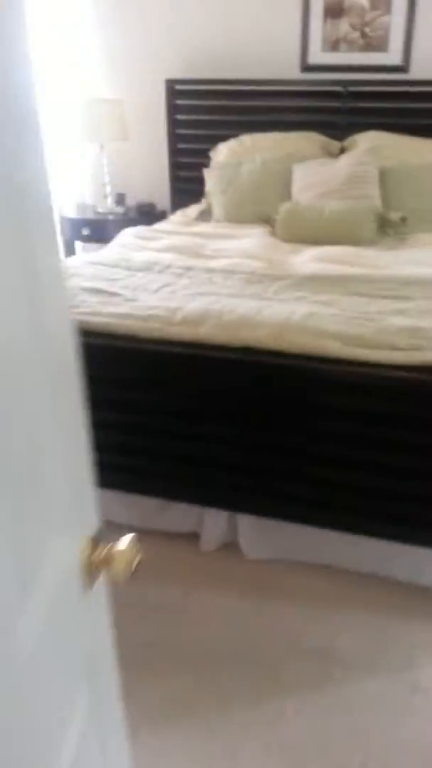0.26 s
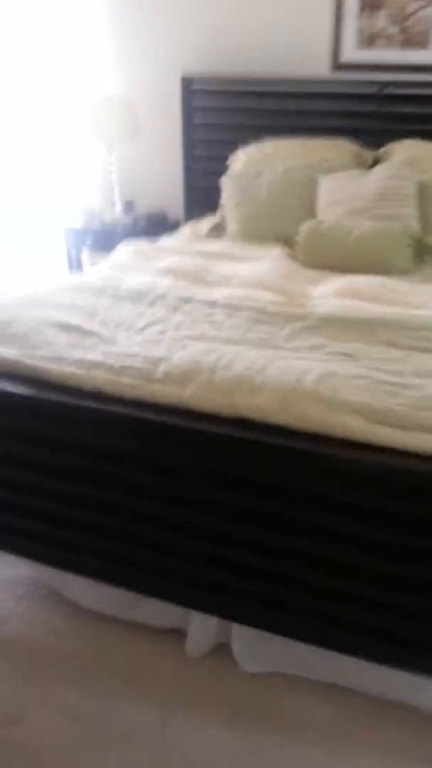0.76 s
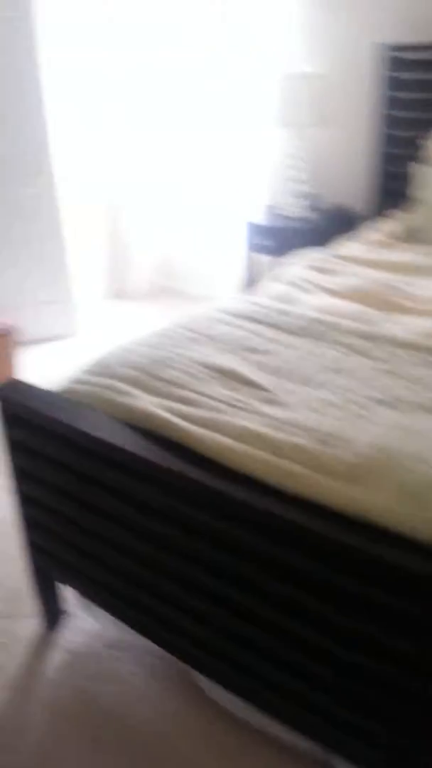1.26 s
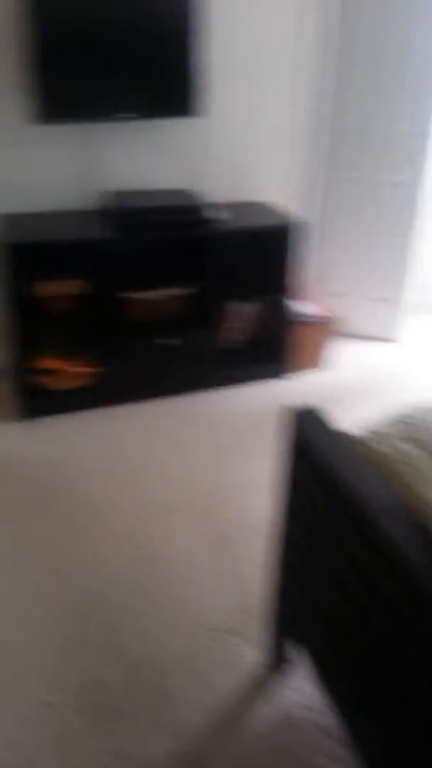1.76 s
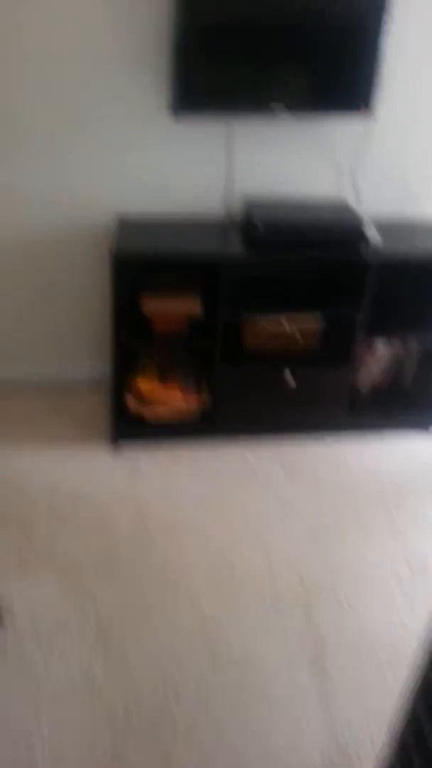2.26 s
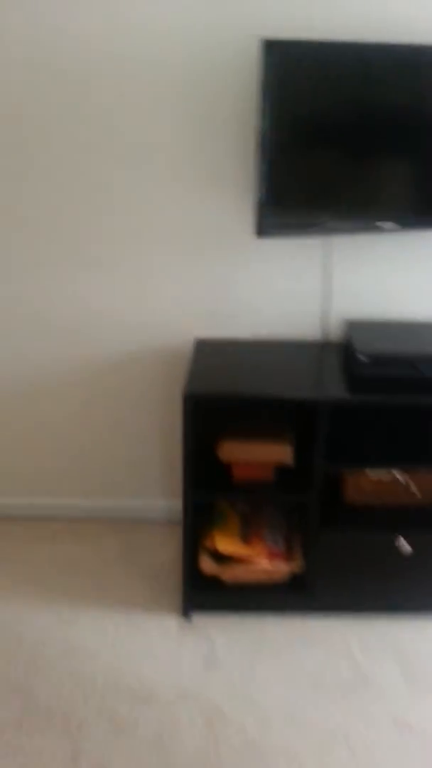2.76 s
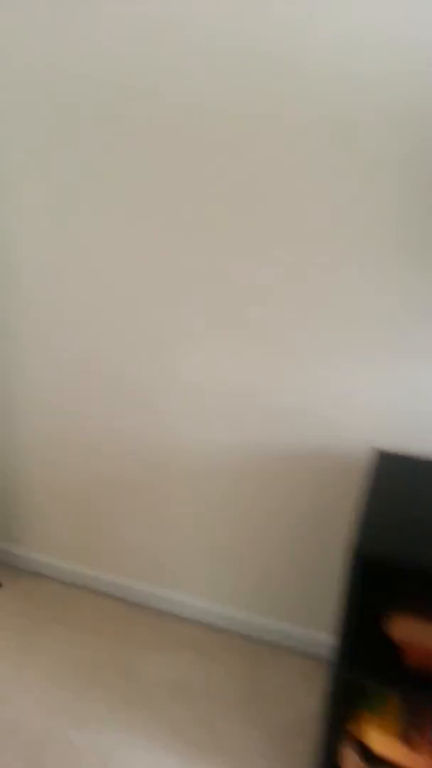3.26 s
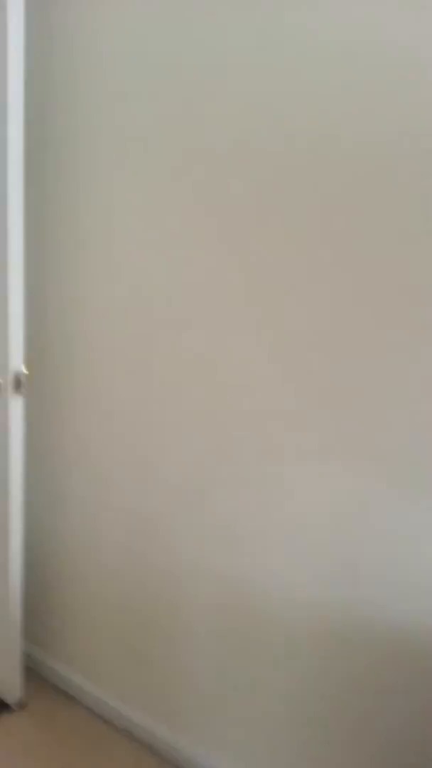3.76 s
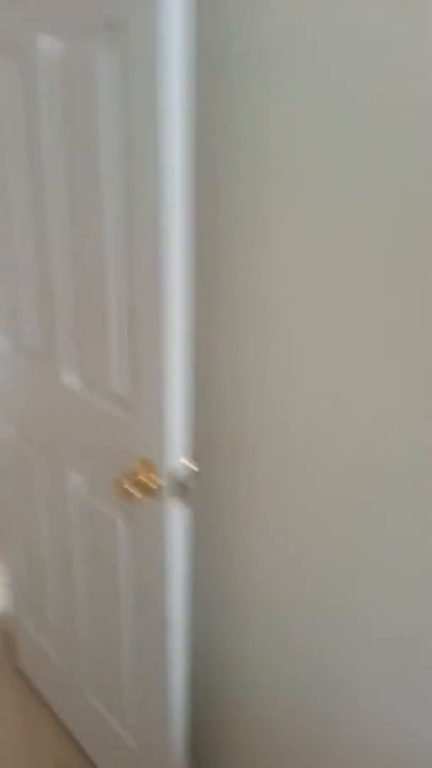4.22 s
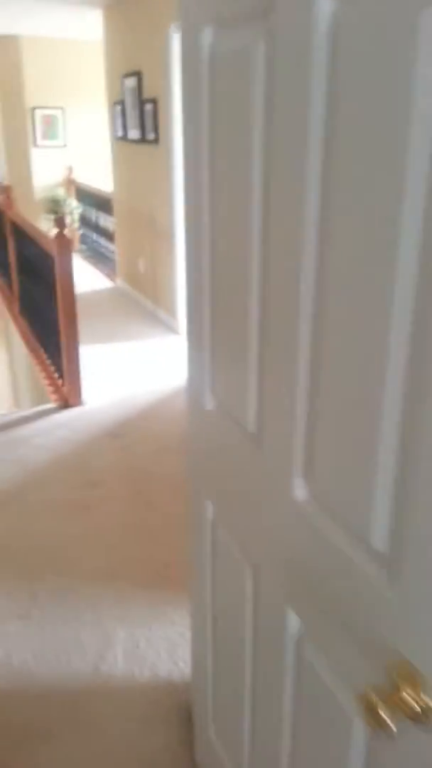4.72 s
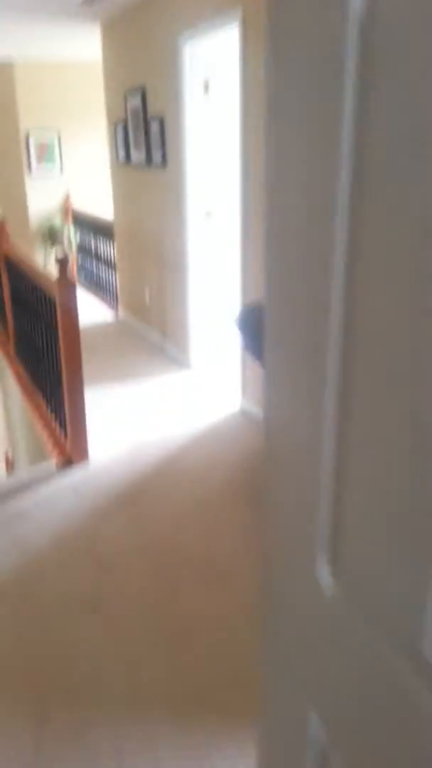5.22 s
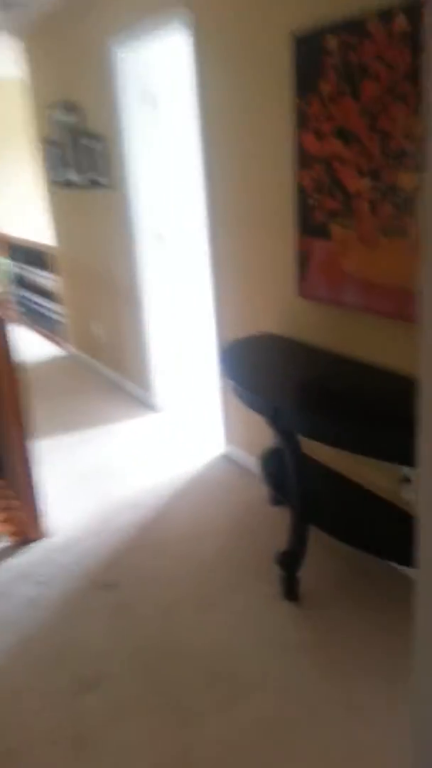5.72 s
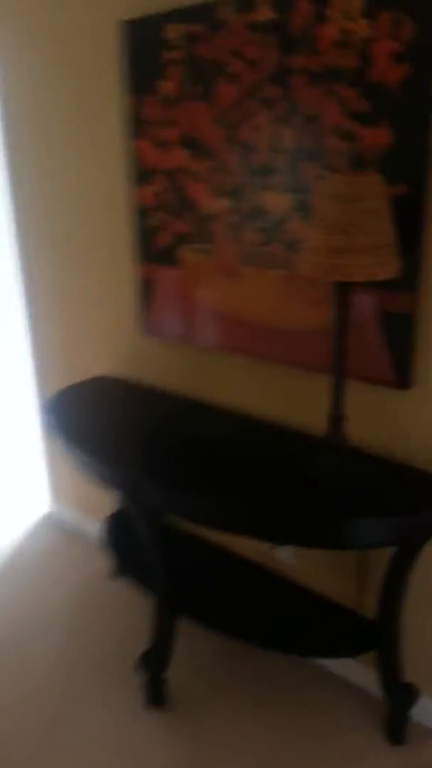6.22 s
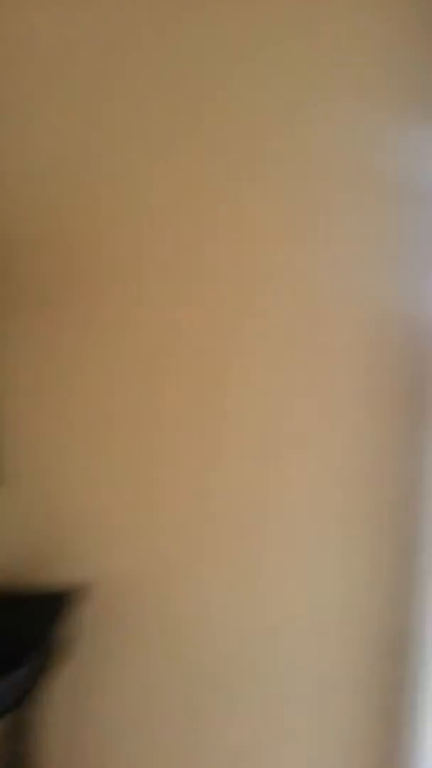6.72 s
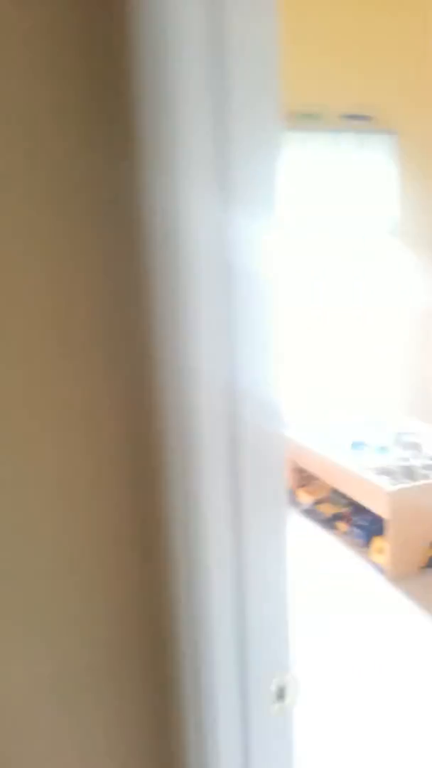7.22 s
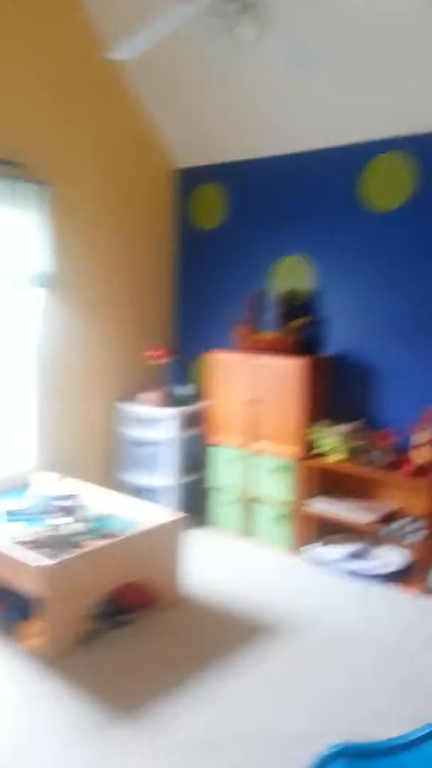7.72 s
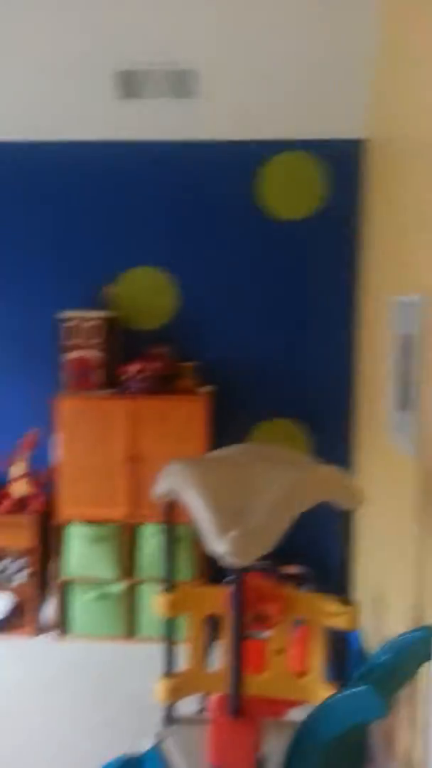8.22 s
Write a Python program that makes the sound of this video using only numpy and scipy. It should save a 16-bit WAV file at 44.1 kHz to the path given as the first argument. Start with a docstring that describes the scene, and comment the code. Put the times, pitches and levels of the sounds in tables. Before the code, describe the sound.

From 0 to 0.15 s a hollow wooden door knocks in a fast cluster, low-mid and woody, with a slight rattle and its edge dragging over carpet. A tiny creak leads to 0.28 s, when it bumps with sharp metallic latch clicks and a short shudder of door and frame; a last weak knock comes at 0.44 s. Then everything is far quieter: soft, dull, irregular footsteps on carpet from 0.6 s on, with rustling cloth and light sole scrapes. Small dry footwear snaps appear around 2.1 and 2.9 s; a longer cloth swish at 3.6 s. Steps grow busier from 4.2 s, with crisper snaps near 4.9, 5.7 and 6.2 s, and a hollow floor knock at 6.4 s. Soft pats and rustles continue until the end at about 8.4 s. Faint room air persists; a very weak low hum enters near 7 s, thin high whines after 8 s. Close handheld stereo pickup, short furnished-room reflections.

```python
"""First a door panel is pushed, knocks and bumps against the wall with clicks of its latch; then someone walks
over carpet. The door is a sum of decaying modes with band noise for its shudder; latch and feet are short
damped swings. A faint creak, soles scraping, cloth swishing and the door's edge dragging are filtered, shaped
noise. Still air lies underneath; late on a faint hum and two thin whines, sines, fade in and waver in level.
All is heard at the two ports of a phone in the walker's hand."""
import sys
import numpy as np
from scipy import signal
from scipy.fft import rfft, irfft
from scipy.io import wavfile
from scipy.ndimage import uniform_filter1d

SR = 44100
rng = np.random.default_rng(int(sys.argv[2]) if len(sys.argv) > 2 else 0)


def to_wav(sig):
    """Store sig (one row per channel, or 1-D mono) as 16-bit WAV at the path in sys.argv[1].

    Samples outside -1..1 are clipped; the rate is SR.
    """
    pcm = np.clip(np.atleast_2d(sig), -1, 1) * 32767
    pcm = np.round(pcm).astype(np.int16)
    wavfile.write(sys.argv[1], SR, pcm.T)  # frames by channels


N = 373968
TIME = np.arange(N) / SR

# blows on the panel: (time [s], level [dB], brightness of the contact [Hz], ring time against the free mode [ratio])
DOOR_BLOWS = [(0.0, -6, 260, 0.67), (0.0502, 1, 390, 0.14), (0.063, 5, 230, 0.37), (0.0733, 9, 240, 0.3),
              (0.118, -8, 301, 0.88), (0.166, -5, 282, 0.11), (0.2815, -10, 2470, 0.79),
              (0.2937, -6.5, 900, 1.4), (0.435, -9, 400, 0.26)]
# modes of the free door panel: (frequency [Hz], level [dB], t60 [s])
DOOR_MODES = [(80.5, -65, 0.52), (157, -52, 0.29), (205, -31.5, 0.25), (234, -33.5, 0.29),
              (279, -32.5, 0.41), (309.5, -31.5, 0.31), (324.5, -38.5, 0.33), (342.6, -32.5, 0.34),
              (482, -41, 0.48), (1435, -32, 0.28), (1700, -50, 0.37), (1780, -41.5, 0.3), (1950, -33, .3),
              (2260, -46, 0.42)]
# octaves of the shaken door, frame and walls after the bump: (centre [Hz], level [dB], t60 [s])
SHUDDER = [(70.3, -45, 0.78), (143, -47.5, 0.71), (285, -33.5, 0.42), (642, -42, 0.65), (1557, -36, 0.44),
           (2220, -39, 0.45), (3500, -49.5, 0.84), (5050, -38, 0.29), (5900, -38.5, 0.64)]


def door(panel_db=0, shudder_db=0, bump_s=.2815, spread_s=0.0016):
    """Modal synthesis: a blow excites the modes up to its brightness; the bump shakes the frame too."""
    out, t = np.zeros((2, N)), TIME[:SR]
    build_up = 1 - np.exp(-t / spread_s)  # bending waves need a moment to cross the panel
    for s, db, bright_hz, ring in DOOR_BLOWS:
        for hz, mode_db, t60 in DOOR_MODES:
            size = amp(panel_db + db + mode_db) / (1 + (hz / bright_hz) ** 4)
            decay = amp(-60 * t / (t60 * ring))
            add(out, s, size * build_up * np.sin(2 * np.pi * hz * t) * decay)
    for hz, db, t60 in SHUDDER:
        onset = np.minimum(t / 0.0011, 1)
        decay = amp(shudder_db + db - 60 * t / t60)
        add(out, bump_s, band_noise(hz, len(t)) * decay * onset)
    return out


# clicks of the latch and knob: (time [s], level [dB])
LATCH = [(0.0495, -38), (0.2800, -17.5), (0.2873, -26), (0.2867, -25), (0.2905, -37)]


def latch(ring_hz=6750, cycles=1.84):
    """Impact of small bodies: loose metal parts click in brief, high, strongly damped swings."""
    out = np.zeros(N)
    for s, db in LATCH:
        add(out, s, amp(db) * ping(ring_hz, cycles))
    return room(out, early_db=-5, tail_db=-5.5)


# soft pats of the feet: (time [s], pat level [dB], pitch [Hz], slap level [dB])
PATS = [(.597, -40.5, 232, -50), (0.618, -39.5, 240, -49), (0.7009, -48, 304, -45), (.919, -48, 253, -59),
        (1.479, -43, 550, -44), (1.5013, -44, 240, -63), (1.632, -35, 440, -47), (2.0373, -43, 274, -45.5),
        (2.1463, -50, 636, -59), (2.2811, -37.5, 610, -42), (2.3753, -39, 660, -59),
        (2.4523, -40.5, 235, -54), (2.4694, -36, 510, -41), (2.9134, -40.5, 540, -39),
        (3.1187, -37.5, 720, -66), (3.142, -43, 317, -66), (3.269, -50.5, 220, -66),
        (3.5634, -47.5, 380, -65), (3.771, -33.5, 720, -60), (4.077, -36, 300, -43.5),
        (4.267, -37, 760, -41), (4.559, -34, 634, -38), (4.5643, -33, 580, -57), (5.055, -40, 251, -56),
        (5.1401, -41.5, 610, -37), (5.4646, -46, 204, -51), (5.6188, -42, 510, -63),
        (5.6617, -33.5, 507, -36), (5.9088, -35, 308, -55), (6.08, -39.5, 456, -44), (6.195, -44, 216, -45),
        (6.604, -32, 382, -45.5), (6.9087, -37.5, 440, -43), (7.0035, -45, 185, -64),
        (7.2834, -32, 754, -40), (7.6774, -45.5, 345, -60), (7.7487, -50, 356, -67),
        (8.0963, -42, 440, -55), (8.1922, -41, 326, -51)]
# small snaps of the footwear: (time [s], level [dB], pitch [Hz])
SNAPS = [(.5676, -41, 2720), (.7763, -45, 2010), (1.4301, -42, 2000), (1.4782, -50, 1940),
         (1.5199, -50.5, 2000), (1.8245, -56, 2230), (2.147, -34.5, 1640), (2.2119, -44, 1620),
         (2.2811, -38, 1830), (2.4553, -51, 2100), (2.4694, -39, 1950), (2.5387, -50, 2490),
         (2.9137, -36.5, 1650), (3.5778, -36, 1830), (3.6769, -39, 1860), (4.2654, -38, 2000),
         (4.9278, -29.5, 1790), (4.9745, -34, 1830), (4.9864, -40, 1900), (5.0627, -41, 1670),
         (5.6617, -29.5, 1880), (5.7516, -26, 2680), (6.1945, -40.5, 1720), (6.2003, -30.5, 2600),
         (6.3538, -35.5, 1730), (6.5376, -45, 1930), (7.0201, -42, 1980), (7.2828, -57, 1260),
         (7.871, -40.5, 1860)]
# hollow knocks of the floor under a step: (time [s], level [dB], pitch [Hz], swing up to its peak [cycles])
FLOOR_KNOCKS = [(0.7, -46.5, 182, 1.9), (0.927, -59, 197, 3.7), (3.565, -54.5, 59.5, 0.73),
                (4.562, -54, 50, .6), (5.912, -47.5, 158, 2.2), (6.195, -46.5, 182, 2.6),
                (6.3578, -38, 344, 1.64), (6.881, -47, 170, 0.68), (7.011, -51, 141, 1.55)]
# every pat also thumps the boards: dB against the pat's level in the table, Hz, cycles up to the peak
THUMP_DB, THUMP_HZ, THUMP_CYCLES = -20, 178, 1.37


def footsteps(pat_db=-1, slap_db=-1, slap_hz=1080, snap_db=0, knock_db=0):
    """Impact and response: pats with slaps on top, snaps of the footwear, the floor answering below."""
    pat_rows = [row[:3] for row in PATS]
    slap_rows = [(s, db, slap_hz) for s, _, _, db in PATS]
    pats = contacts(pat_rows, cycles=0.4, settle_s=0.0068, settle_db=-2.5)
    slaps = contacts(slap_rows, cycles=0.75, settle_s=0.00097, settle_db=7.5)
    snaps = contacts(SNAPS, cycles=0.71, settle_s=0.002, settle_db=-1)
    knocks = np.zeros(N)
    for s, db, hz, cycles in FLOOR_KNOCKS:
        add(knocks, s, amp(db) * ping(hz, cycles))
    for s, db, _, _ in PATS:
        add(knocks, s, amp(db + THUMP_DB) * ping(THUMP_HZ, THUMP_CYCLES))
    low = amp(pat_db) * pats + amp(slap_db) * slaps + amp(knock_db) * knocks
    low = room(low, early_db=-5.0, tail_db=-21.0)
    return low + room(amp(snap_db) * snaps, early_db=-6.0, tail_db=-15)


# settling after a contact is relatively stronger after a gentle one:
# dB at a usual contact, that contact's level in dB, dB less per dB of force
SETTLING_DB, USUAL_PEAK_DB, SETTLING_SLOPE = -4.5, -41.5, 0.16


def contacts(table, cycles, settle_s, settle_db):
    """Repeated micro-impact: one short swing, then a dying flurry of crisper ones as the sole settles."""
    out, t = np.zeros(N), TIME[:SR // 8]
    for s, db, hz in table:
        after_db = SETTLING_DB - SETTLING_SLOPE * (db - USUAL_PEAK_DB)
        first = ping(hz, cycles)
        sparse_hits = rng.standard_normal(len(t)) * (rng.random(len(t)) < .05)
        flurry = sparse_hits * t * np.exp(-t / settle_s)
        flurry = signal.fftconvolve(flurry, ping(hz, cycles / 2))[:len(first)]
        flurry = signal.sosfilt(signal.butter(1, hz / 2, "highpass", fs=SR, output="sos"), flurry)
        flurry *= np.linalg.norm(first) / np.linalg.norm(flurry)  # same energy as the first swing
        add(out, s, amp(db) * (first + amp(after_db + settle_db) * flurry))
    return out


# a faint creak early on, then soles sliding and pressing into the carpet:
# (time [s], length [s], scrape level [dB], scrape pitch [Hz], rumble level [dB])
SCUFFS = [(0.211, 0.053, -65, 990, -55), (0.63, 0.22, -63, 950, -59), (0.88, 0.25, -73, 720, -64.5),
          (1.571, 0.19, -70, 630, -67), (1.995, 0.11, -62.5, 800, -66.5), (2.134, 0.15, -64.5, 1170, -63.5),
          (2.258, 0.059, -66, 1000, -58), (2.361, 0.063, -59.5, 880, -64), (2.528, 0.067, -63.5, 900, -62),
          (3.108, 0.14, -58, 613, -57), (3.426, 0.063, -62, 1770, -64.5), (3.566, 0.029, -56.5, 1190, -76),
          (3.668, 0.15, -85, 870, -57), (4.079, 0.32, -67, 830, -63.5), (4.394, 0.049, -59, 2100, -82),
          (4.456, 0.15, -61, 810, -61), (4.814, 0.073, -50.5, 1940, -73), (4.927, 0.12, -62, 1250, -57.5),
          (5.054, 0.048, -64, 1400, -52), (5.135, 0.035, -59, 1000, -48), (5.157, 0.27, -75, 700, -65),
          (5.624, 0.25, -67, 700, -65.5), (5.814, 0.054, -70, 600, -55.5), (5.86, 0.078, -55.5, 670, -49.5),
          (6.184, 0.15, -64, 1980, -58), (6.36, 0.2, -66.5, 1410, -59), (6.832, 0.19, -60.5, 1380, -57.5),
          (6.996, 0.096, -68, 1390, -60.5), (7.254, 0.058, -60, 1010, -53.5), (7.31, 0.058, -62, 2270, -80),
          (7.733, 0.1, -68, 1530, -62.5), (7.848, 0.085, -68, 1790, -60.5), (8.178, 0.18, -69, 690, -63.5)]
# spectrum of the floor under a tread: (frequency [Hz], relative level per Hz [dB])
TREAD_COLOUR = [(20, -29), (40, -4), (60, 1), (100, -3.5), (170, -1), (290, -2), (420, -10.5), (650, -11.5),
                (1200, -30.5), (4000, -40.5)]
# the floor rumbles a little all the time, and more in step with the cloth: dB, dB against the cloth
FLOOR_REST_DB, FLOOR_SWAY_DB = -76, -12


def scuffs(motion, scrape_db=0, rumble_db=0, spread=2.4, grain_db=5.0, catches_per_s=1800):
    """Stick-slip friction: a creak, then soles, scrape in little catches over a rumble of the floor."""
    scrape, weight = np.zeros(N), np.zeros(N)
    catches = rng.random(N) < catches_per_s / SR
    slips = catches * rng.standard_normal(N) * amp(grain_db * wander(0.005))
    for s, length, db, hz, weight_db in SCUFFS:
        t = TIME[:int(length * SR)]
        swell = np.sin(np.pi * (t / length) ** 0.61)  # rises faster than it dies away
        grains = signal.lfilter(*signal.iirpeak(hz, 1 / spread, fs=SR), slips[int(s * SR):][:len(t)])
        grains = signal.sosfilt(signal.butter(2, 1.41 * hz, fs=SR, output="sos"), grains)
        add(scrape, s, amp(scrape_db + db) * swell * unit(grains))
        add(weight, s, amp(rumble_db + weight_db) * swell)
    sway = np.hypot(amp(FLOOR_REST_DB), amp(FLOOR_SWAY_DB) * motion)
    floor = np.hypot(weight, sway) * friction(TREAD_COLOUR, grain_db=3.0, diffuse_db=-10)
    return room(scrape, early_db=-4.0, tail_db=-19.5) + floor


# quick bright rustles and ticks, the first a rattle at the door:
# (time [s], level [dB], decay [s], lower edge [Hz])
BRUSHES = [(.048, -43.5, .014, 2930), (.621, -42, 0.034, 6140), (1.429, -72, 0.0067, 3000),
           (2.455, -59, .017, 4000), (2.902, -66, 0.011, 3000), (2.986, -48.5, 0.011, 7000),
           (3.035, -45.5, 0.0083, 6000), (4.407, -49, 0.056, 5940), (5.754, -37.5, 0.013, 3000),
           (5.762, -41, .009, 5950), (6.424, -45.5, 0.033, 4970), (6.474, -46, 0.011, 5000),
           (7.64, -38, 0.01, 11400)]
# the door's edge dragging over the carpet as it is pushed: (time [s], level [dB])
DRAG = [(0, -45), (.045, -46), (.055, -40), (.1, -48), (.17, -52), (.19, -60), (.27, -60), (.33, -90)]
# spectra of swishing cloth and of the dragging edge: (frequency [Hz], relative level per Hz [dB])
SWISH_COLOUR = [(300, 3), (1000, -1), (2400, 0.5), (3500, 0.5), (5200, 1), (8000, 0.5), (11000, -1.5),
                (14500, -7.5)]
DRAG_COLOUR = [(25, -24), (80, -16), (210, 6), (340, -4.5), (550, -3.5), (1000, -13), (3000, -18.5),
               (7000, -23.5), (14000, -34)]


def rubbing(motion, swish_db=1.0, tick_db=-1, drag_db=0, folds_db=1.85, fold_s=0.045):
    """Friction noise: cloth swishes, the door's edge drags; quick bright rustles and ticks stand out."""
    ticks, t = np.zeros((2, N)), TIME[:SR // 4]
    for s, db, decay_s, edge_hz in BRUSHES:
        high_pass = signal.butter(2, edge_hz, "highpass", fs=SR, output="sos")
        hiss = signal.sosfilt(high_pass, rng.standard_normal((2, len(t))))
        envelope = np.minimum(t / 0.00076, 1) * np.exp(-t / decay_s)
        add(ticks, s, amp(tick_db + db) * envelope * unit(hiss))
    folds = amp(swish_db + folds_db * wander(fold_s))
    cloth = folds * motion * friction(SWISH_COLOUR, grain_db=0.98, diffuse_db=12.5)
    edge = amp(drag_db) * follow(DRAG) * friction(DRAG_COLOUR, grain_db=2.0, diffuse_db=5.0)
    return cloth + ticks + edge


# swishes and rustles of cloth, short and long: (time [s], length [s], level [dB])
SWISHES = [(0.053, 0.35, -69), (0.396, 0.2, -61.5), (.629, 0.059, -49), (.733, 0.12, -66.5),
           (0.876, .15, -68.5), (1.411, 0.028, -60.5), (1.47, .015, -66), (1.573, 0.077, -68),
           (1.927, 0.043, -62), (1.983, 0.081, -56), (2.115, 0.065, -63.5), (2.248, 0.047, -58),
           (2.346, 0.057, -64), (2.444, 0.015, -57), (2.528, 0.024, -63.5), (2.894, 0.012, -56.5),
           (2.962, 0.11, -61.5), (3.077, .11, -61), (3.243, 0.11, -63), (3.408, 0.12, -62.5),
           (3.554, 0.017, -59), (3.597, .26, -52.5), (3.912, 0.24, -67), (4.152, .13, -57.5),
           (4.375, 0.12, -58), (4.521, 0.051, -57.5), (4.662, 0.021, -62.5), (4.778, 0.11, -52.5),
           (4.892, 0.13, -57.5), (5.041, 0.023, -58), (5.11, 0.029, -56), (5.168, 0.079, -67),
           (5.37, 0.12, -64), (5.503, 0.011, -58), (5.601, 0.082, -53.5), (5.726, 0.041, -52.5),
           (5.867, 0.1, -56.5), (6.062, .028, -63.5), (6.17, 0.076, -59), (6.32, 0.043, -59),
           (6.424, 0.08, -62.5), (6.571, 0.016, -64), (6.833, 0.11, -64), (6.994, .043, -64),
           (7.096, 0.028, -61.5), (7.248, 0.17, -54.5), (7.629, 0.0095, -63), (7.742, 0.044, -67.5),
           (7.837, .052, -66), (8.01, 0.013, -65), (8.065, 0.048, -67), (8.166, 0.094, -65.5),
           (8.34, 0.028, -71)]
# a swish rises for a fixed time plus a share of its length; some rustle never stops
SWISH_ATTACK_S, SWISH_RISE_SHARE, SWISH_RELEASE_S, RUSTLE_DB = .011, 0.32, 0.049, -76.5


def cloth_motion():
    """Addition of powers: unrelated swishes of cloth, each rising and dying away, add in energy."""
    power = np.full(N, amp(RUSTLE_DB) ** 2)
    t = TIME[:SR * 3 // 4]
    for s, length, db in SWISHES:
        rise = np.minimum(t / (SWISH_ATTACK_S + SWISH_RISE_SHARE * length), 1)
        fall = np.exp(-np.maximum(t - length, 0) / SWISH_RELEASE_S)
        add(power, s, (amp(db) * rise * fall) ** 2)
    return np.sqrt(power)


# spectrum of the still air: (frequency [Hz], relative level per Hz [dB])
AIR_COLOUR = [(20, 13.5), (60, 14), (110, 3.5), (250, 3), (500, 8.5), (1000, 4), (3000, -3), (7000, -70),
              (14500, -11)]
# a faint hum and two thin whines that fade in and waver:
# (first heard [s], fading in for [s], frequency [Hz], level [dB])
HUM = [(6.8, .6, 118.4, -72), (8.0, .2, 5222, -79.5), (8.25, .2, 4118, -85)]


def house(air_db=-78.5):
    """Broadband and tonal background: still air, and tones that fade in and waver as the phone moves."""
    out = amp(air_db) * friction(AIR_COLOUR, grain_db=-2.2, diffuse_db=9.5)
    for s, swell_s, hz, db in HUM:
        fade = np.clip((TIME - s) / swell_s, 0, 1)
        waver_db = 2.5 * wander(.03)
        out = out + amp(db + waver_db) * fade * unit(np.sin(2 * np.pi * hz * TIME))
    return out


def friction(points, grain_db, diffuse_db):
    """Random superposition: noise with an uneven grain, part of it direct and part arriving scattered."""
    noise = rng.standard_normal((3, N)) * amp(grain_db * wander(0.0044))
    return colour(ports(noise[0]) + amp(diffuse_db) * noise[1:], points)


def ping(hz, cycles):
    """Damped oscillation: a swing whose envelope peaks smoothly after the given number of cycles."""
    age = TIME[:SR // 4] * hz / cycles
    envelope = age ** 2 * np.exp(2 - 2 * age)
    return envelope * np.sin(2 * np.pi * cycles * age)


def room(x, early_db, tail_db, t60_s=0.4, early_s=0.0069):
    """Room response: direct sound, dense scatter off near walls and furniture, and a diffuse tail."""
    t = TIME[:SR // 2]
    octaves_hz = 90 * 2 ** np.arange(8)
    scatter = sum(np.sqrt(hz) * band_noise(hz, len(t)) for hz in octaves_hz)
    early = np.clip(t / 0.0032 - 1, 0, 1) * np.exp(-t / early_s)  # silent for the first 3.2 ms
    early = amp(early_db) * early / np.linalg.norm(early)
    tail = np.minimum(t / 0.017, 1) * amp(-60 * t / t60_s)
    tail = amp(tail_db) * tail / np.linalg.norm(tail)
    response = unit(scatter) * np.hypot(early, tail)
    return ports(x) + signal.fftconvolve(x[None], response, axes=1)[:, :N]


PORT_LAG_S = 0.00041


def ports(x):
    """Arrival-time difference: sound from below reaches the left port first."""
    return np.array([x, np.interp(TIME - PORT_LAG_S, TIME, x)])


def band_noise(hz, size):
    """Spatial coherence: an octave of noise, alike at both ports in the bass, unrelated in the treble."""
    edges = np.minimum([hz / np.sqrt(2), hz * np.sqrt(2)], SR / 2 - 1)
    octave = signal.butter(3, edges, "bandpass", fs=SR, output="sos")
    noise = signal.sosfilt(octave, rng.standard_normal((3, 2 * size)))[:, size:]  # filter has settled
    shared = 1 / (1 + (hz / 650) ** 2)
    return unit(np.sqrt(shared) * noise[0] + np.sqrt(1 - shared) * noise[1:])


def colour(x, points):
    """Spectral shaping: weight x by a (frequency [Hz], level [dB]) curve; rms 1."""
    hz, db = np.transpose(points)
    f = np.maximum(np.fft.rfftfreq(x.shape[-1], 1 / SR), 1)
    gain = amp(np.interp(np.log(f), np.log(hz), db))
    return unit(irfft(rfft(x) * gain, x.shape[-1]))


def wander(span_s):
    """Low-pass random process: smooth chance that changes over the given time; rms 1."""
    size = max(int(span_s * SR), 2)
    smooth = uniform_filter1d(rng.standard_normal(N), size)
    return unit(uniform_filter1d(smooth, size))


def follow(curve):
    """Amplitude envelope: gain along a (time [s], level [dB]) curve."""
    s, db = np.transpose(curve)
    return amp(np.interp(TIME, s, db))


def amp(db):
    """Logarithmic level: decibels to gain."""
    return 10 ** (np.asarray(db) / 20)


def unit(x):
    """Normalization: scale to rms 1."""
    return x / np.sqrt(np.mean(x ** 2))


def add(out, s, sound):
    """Linear superposition: mix a sound in at time s."""
    i = max(int(s * SR), 0)
    out[..., i:i + sound.shape[-1]] += sound[..., :N - i]


def scene():
    """Superposition of sources: the door, the walk and the house around them."""
    motion = cloth_motion()
    return door() + latch() + footsteps() + scuffs(motion) + rubbing(motion) + house()


def port_tube(x, hz, width_hz, boost):
    """Tube resonance: the little tube in front of a microphone lifts a band of treble."""
    return x + boost * signal.lfilter(*signal.iirpeak(hz, hz / width_hz, fs=SR), x)


TOP_HZ = 14800


def record(dry, left_db=4.0, right_db=-0.03, left_cut_hz=90, right_cut_hz=28):
    """Receiver response: each port has its treble resonance, the left less bass; the top is cut."""
    left = amp(left_db) * port_tube(dry[0], hz=5900, width_hz=1300, boost=0.23)
    left = signal.sosfilt(signal.butter(1, left_cut_hz, "highpass", fs=SR, output="sos"), left)
    right = amp(right_db) * port_tube(dry[1], hz=6920, width_hz=1140, boost=2.38)
    right = signal.sosfilt(signal.butter(1, right_cut_hz, "highpass", fs=SR, output="sos"), right)
    top_cut = signal.ellip(10, .2, 70, TOP_HZ, fs=SR, output="sos")
    return signal.sosfilt(top_cut, np.array([left, right]))


dry = scene()
out = record(dry)
to_wav(out)
```